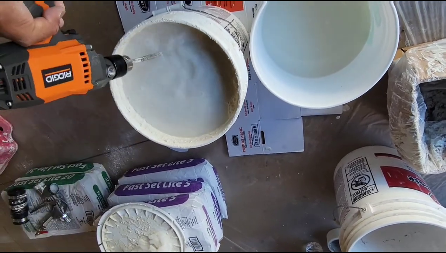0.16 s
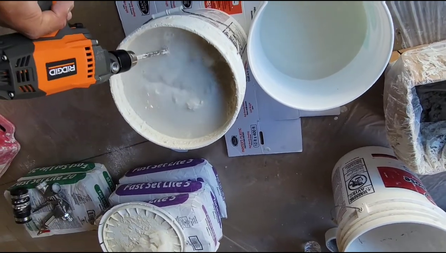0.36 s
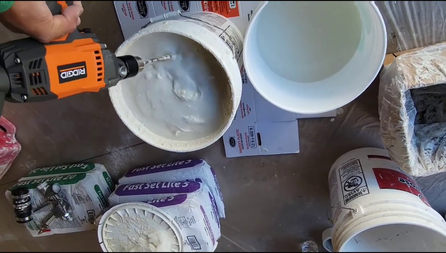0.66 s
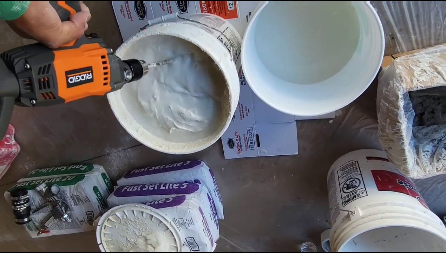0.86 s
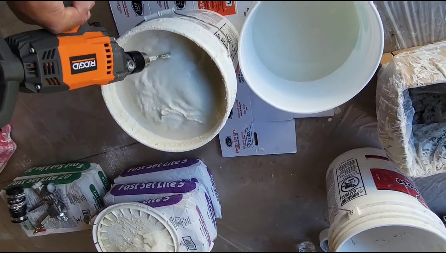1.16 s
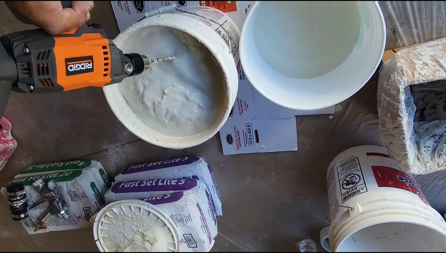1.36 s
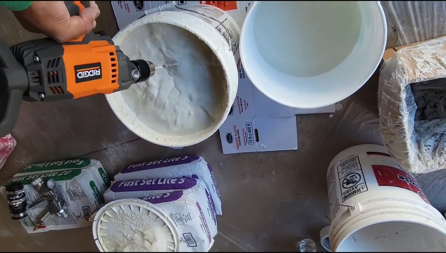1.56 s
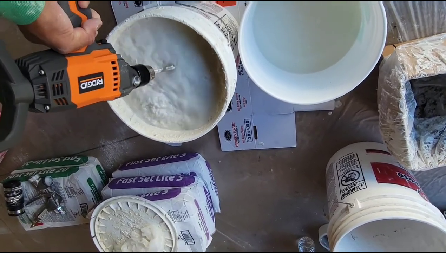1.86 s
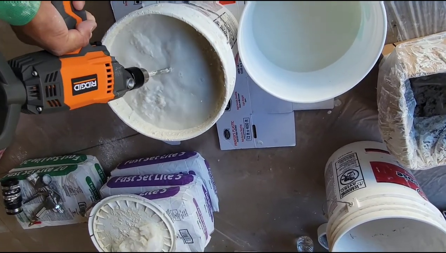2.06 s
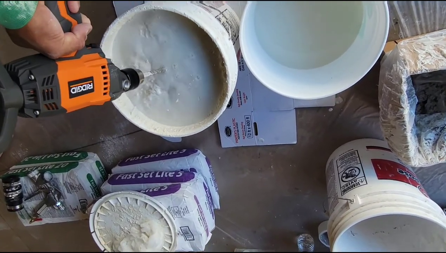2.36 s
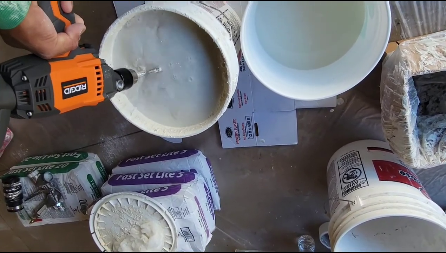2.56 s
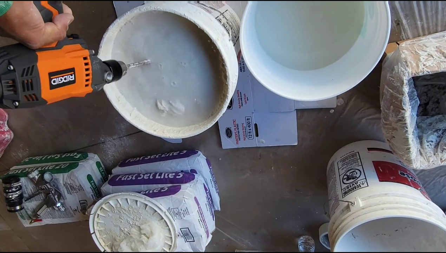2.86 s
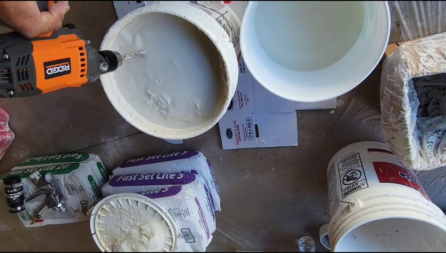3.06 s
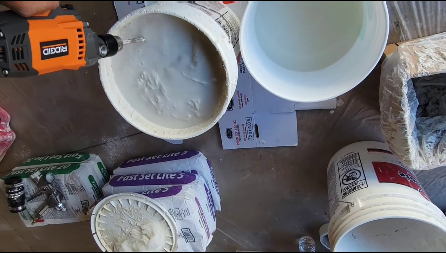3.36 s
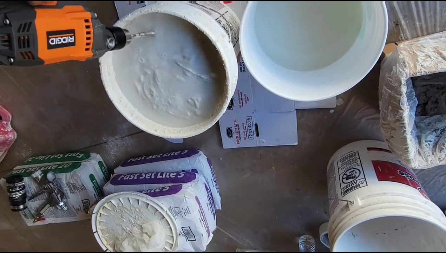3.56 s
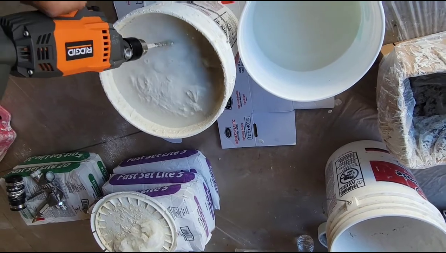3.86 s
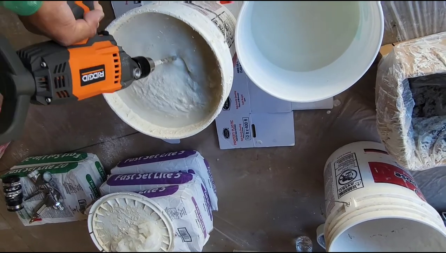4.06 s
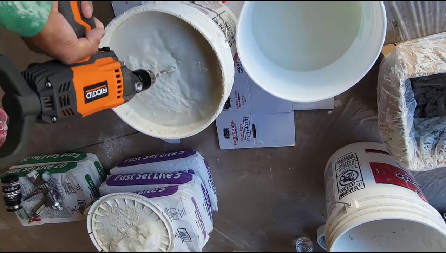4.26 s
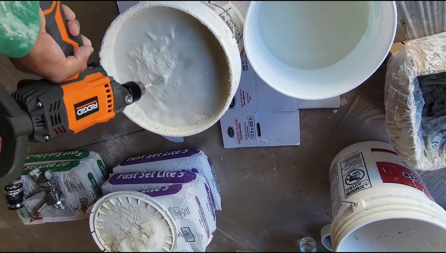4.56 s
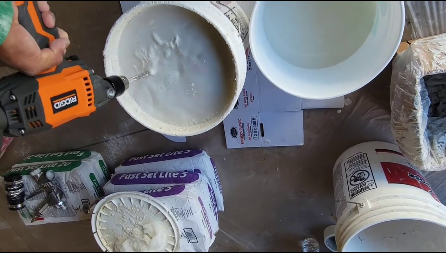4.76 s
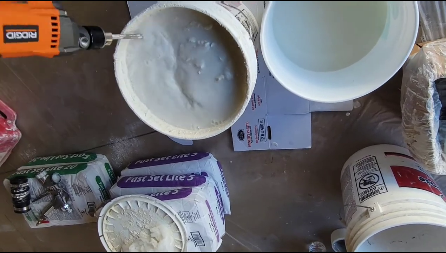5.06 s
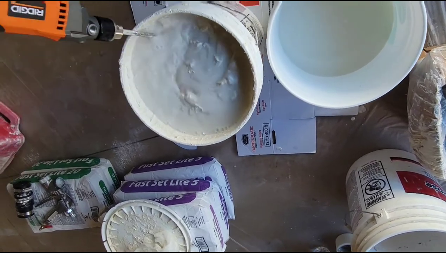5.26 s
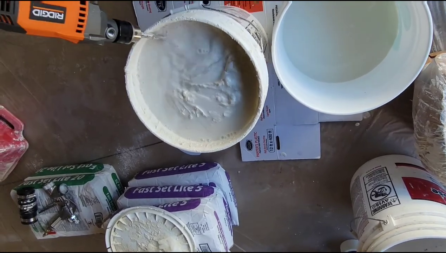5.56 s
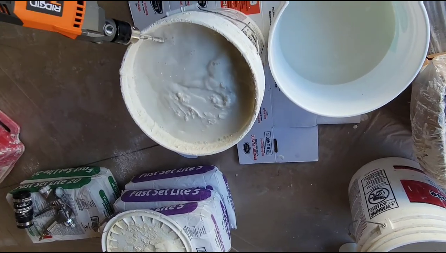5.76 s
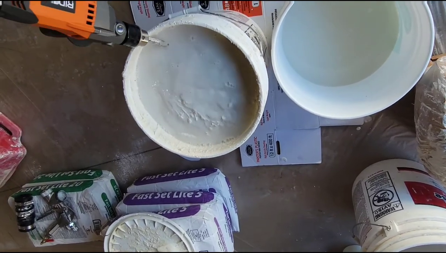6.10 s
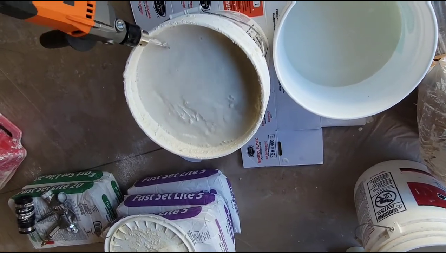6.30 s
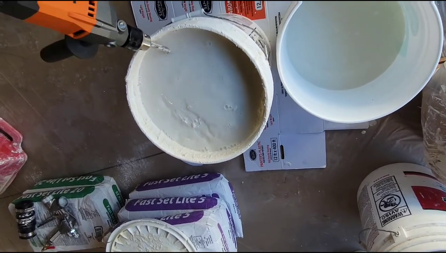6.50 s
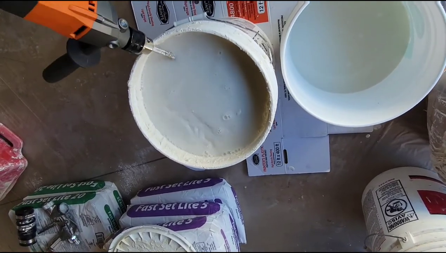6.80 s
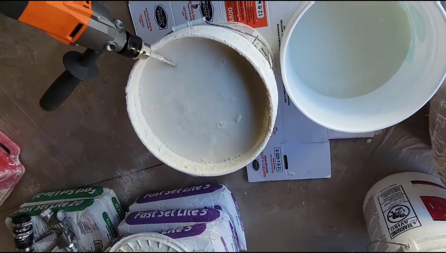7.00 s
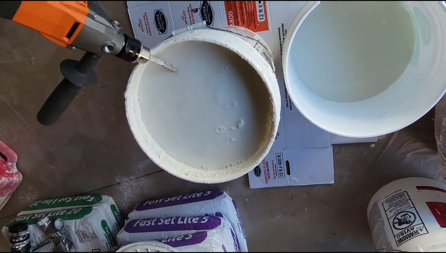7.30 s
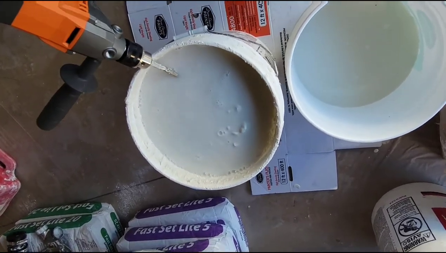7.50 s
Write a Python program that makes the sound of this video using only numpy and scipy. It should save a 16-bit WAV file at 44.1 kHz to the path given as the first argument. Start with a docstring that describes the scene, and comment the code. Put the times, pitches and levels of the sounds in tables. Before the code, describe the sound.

Close, loud drill motor with rushing fan air and raspy gears, wet paddle gulps early on, then a gliding wind-down to a scraping stop.

```python
"""Close by a plastic bucket, a phone's two microphone ports hear a corded mixing drill churn thick compound.
From the start its fan roars and whistles, brushes and gears rasp, the shaft hums and a far engine drones;
the paddle gulps, mostly in the first 1.3 s. At 5 s the drill is switched off and coasts to rest, its
falling tones swelling as they glide through the housing's resonances while the rasp goes on to the stop.
In the last moments, at 7.5 s, a soft rush sets in."""
import sys
import numpy as np
from scipy import signal
from scipy.fft import rfft, irfft
from scipy.io import wavfile

SR = 44100
rng = np.random.default_rng(int(sys.argv[2]) if len(sys.argv) > 2 else 0)


def persist_wave(psi):
    """Save psi, clipped to +-1, as 16-bit WAV."""
    counts = np.round(np.clip(psi, -1, 1) * 32767).astype(np.int16)
    wavfile.write(sys.argv[1], SR, np.atleast_2d(counts).T)


N = 336910
T = np.arange(N) / SR
FREQS = np.maximum(np.arange(N // 2 + 1) * SR / N, 1)
TOP_HZ = 15800  # the phone passes nothing above this
FULL_HZ = 378  # rotor turns per second at which the running levels are given


def undb(db):
    """Decibels to gain."""
    return 10 ** (np.asarray(db) / 20)


def unit(x):
    """Scale to rms 1, over both ports together."""
    return x / np.sqrt(np.mean(x ** 2))


def curve(rows):
    """Each column of a table, joined by straight lines in time."""
    time_s, *columns = np.transpose(rows)
    return np.array([np.interp(T, time_s, column) for column in columns])


def spectrum(rows, peaks=()):
    """Each column of a table over log frequency, plus bell-shaped resonances."""
    pitch_hz, *columns = np.transpose(rows)
    out = np.array([np.interp(np.log(FREQS), np.log(pitch_hz), column) for column in columns])
    for centre_hz, width_hz, *heights_db in peaks:
        out = out + np.outer(heights_db, np.exp(-((FREQS - centre_hz) / width_hz) ** 2))
    return out


def shape(x, gain):
    """Filter by a gain per frequency."""
    return irfft(rfft(x) * gain, N)


def band(low_hz, high_hz):
    """Gain of a band with soft edges."""
    return 1 / np.sqrt((1 + (low_hz / FREQS) ** 6) * (1 + (FREQS / high_hz) ** 6))


def ring(x, centre_hz, width_hz):
    """One resonance with steep skirts, at rms 1."""
    return unit(shape(x, 1 / (1 + 2j * (FREQS - centre_hz) / width_hz) ** 2))


def rise(hz, knee_hz, steepness):
    """Gain that grows as a power of speed or pitch, then levels off above the knee."""
    return (hz / (hz ** 4 + knee_hz ** 4) ** (1 / 4)) ** steepness


def walk(rate_hz):
    """Slow random wander with spread 1, smooth on the scale of the rate."""
    steps = np.arange(0, N, 64)
    hz = np.arange(len(steps) // 2 + 1) / T[-1]
    smoothing = np.exp(-np.minimum(hz / rate_hz, 20) ** 2)
    slow = irfft(rfft(rng.standard_normal(len(steps))) * smoothing, len(steps))
    return np.interp(T, steps / SR, unit(slow))


# direct sound reaching the two microphone ports: pitch_hz, left_lead_rad
PORT_LEAD = [(100, 0), (600, .3), (1000, 1.5), (1600, 2.2), (2500, 2.9), (3000, 5.3), (3500, 3.9),
             (5000, 3.8), (5900, 7.8), (7000, 11.8), (9600, 15.6), (11400, 18.3), (13500, 16.8),
             (15500, 18.6)]


def port_lead():
    """Phase of the direct sound at the left and right port, split evenly about their middle."""
    return np.exp(np.outer([.5j, -.5j], spectrum(PORT_LEAD)[0]))


# how alike the two microphone ports hear a noise: pitch_hz, likeness (0-1)
PORT_LIKENESS = [(100, 0.71), (300, 0.94), (560, 0.45), (750, 0.78), (1700, 0.96), (2300, 0.65),
                 (3200, 0.18), (3800, 0.35), (5100, 0.39), (6000, 0.17), (7300, 0.41), (9600, 0.33),
                 (12000, .18), (15000, 0.18)]


def port_noise():
    """Noise at both ports: a shared direct part and unrelated reflections."""
    alike = np.clip(spectrum(PORT_LIKENESS), 0, 1)
    direct = shape(rng.standard_normal(N), np.sqrt(alike) * port_lead())
    reflections = shape(rng.standard_normal((2, N)), np.sqrt(1 - alike))
    return direct + reflections


# engine far off: pitch_hz, level_db
FAR_ENGINE = [(54, -65.5), (70.8, -52.5), (88, -52), (120, -63.5)]
# dull air round the place: pitch_hz, relative level_db
AMBIENT_COLOUR = [(20, -34.5), (38, -19), (52, -3), (80, -3.5), (150, -9), (300, -16.5), (380, -11),
                  (520, -16), (720, -17.5), (1500, -21.5), (4000, -29), (8000, -45), (15000, -42)]
# soft rush at the end: pitch_hz, relative left_db, relative right_db
RUSH_COLOUR = [(100, -12, -7), (250, -6, -13), (380, 9, -3), (550, -3, -9), (800, 7, 3), (1090, -6, -6),
               (1700, 3, 5), (2500, -1, 2), (3400, -8, -14), (4940, -5, -15), (6300, -26, -20),
               (8500, -33, -30), (12500, -31, -35), (15400, -38, -46)]
RUSH_START_S = 7.497


def surroundings(ambient_db=-53.5, rush_db=-40.5, rush_rise_s=0.021, waver_rad=0.99, pan_db=0.9):
    """Far off, engine tones waver in level and phase over dull air; late, a soft rush of noise jumps in."""
    drone = 0
    for pitch_hz, level_db in FAR_ENGINE:
        level = undb(level_db + 2.1 * walk(4)) * np.sqrt(2)
        drone = drone + level * np.sin(2 * np.pi * pitch_hz * T + waver_rad * walk(3))
    ambient = undb(ambient_db) * unit(shape(port_noise(), undb(spectrum(AMBIENT_COLOUR))))
    onset = np.interp(T - RUSH_START_S, [0, .003, rush_rise_s], [0, .6, 1])
    rush = undb(rush_db) * onset * unit(shape(port_noise(), undb(spectrum(RUSH_COLOUR))))
    return (drone + ambient) * undb([[pan_db], [-pan_db]]) + rush


# rotor under power, creeping up as the compound thins: time_s, speed_hz (turns per second)
POWERED_SPEED = [(0, 366.5), (.4, 372.7), (.9, 374.5), (1.12, 373.5), (1.42, 376.5), (1.75, 375.5),
                 (2.4, 378.3), (2.9, 377.8), (4.6, 382.7), (5.0, 381)]
SWITCH_OFF_S = 5.0243
# braking at full speed, and the power of speed that each brake follows
FRICTION_HZ_PER_S, FRICTION_STEEPNESS = 177.2, .274
DRAG_HZ_PER_S, DRAG_STEEPNESS = 257.9, 2.924


def rotor_speed():
    """Turns per second: nearly steady under power, then braked by friction and the drag of fan and compound."""
    powered = curve(POWERED_SPEED)[0]
    falling = np.linspace(powered[-1], 1, 2000)
    share = falling / FULL_HZ
    friction = FRICTION_HZ_PER_S * share ** FRICTION_STEEPNESS
    drag = DRAG_HZ_PER_S * share ** DRAG_STEEPNESS
    # time at which the rotor has fallen to each speed
    reached_s = SWITCH_OFF_S + np.cumsum((falling[0] - falling[1]) / (friction + drag))
    return np.where(T < SWITCH_OFF_S, powered, np.interp(T, reached_s, falling, right=0))


# paddle folding air into the compound: start_s, relative level_db
GULP_TIMES = [(0.533, -29), (0.652, -26.5), (0.772, -32), (0.89, -36), (1.006, -28.5), (1.109, -30),
              (1.139, -32), (1.254, -27), (5.039, -34), (5.099, -35), (5.899, -36)]


def paddle(hz, gulp_db=-1.5, decay_s=0.021, rise_s=0.0076, churn_db=-54.0, gear_ratio=37.0):
    """In the bucket: dull noise gulps in the compound, over a churning that swells once per paddle turn."""
    gulps = np.zeros(N)
    for start_s, level_db in GULP_TIMES:
        age_s = np.maximum(T - start_s, 0)
        gulps += undb(level_db + gulp_db) * (1 - np.exp(-age_s / rise_s)) * np.exp(-age_s / decay_s)
    stroke = 1 + 0.53 * np.cos(2 * np.pi * np.cumsum(hz) / SR / gear_ratio)
    churn = undb(churn_db + 2 * walk(3)) * stroke * hz / FULL_HZ
    compound = unit(shape(rng.standard_normal(N), band(85, 320)))
    return (gulps + churn) * compound


# hard surfaces round the bucket that echo the drill: delay_s, each varied by up to 15 %
BUCKET_ECHOES = [.0071, .0113, .0167, .0239, .031, .043]
# hands and bucket rim close to the vents: delay_s
RIM_ECHOES = [0.000296, 0.00076, 0.0016]


def reflect(x, echo_db=-17.0, sway_s=0.000204, near_db=-18.0):
    """Short echoes comb the noise; the colour drifts as the drill is moved."""
    out = x.copy()
    for port in range(2):
        for delay_s in BUCKET_ECHOES:
            path_s = delay_s * rng.uniform(.85, 1.15) + sway_s * walk(0.415)
            out[port] += undb(echo_db) * np.interp(T - path_s, T, x[port], left=0)
        for delay_s in RIM_ECHOES:
            out[port] += undb(near_db) * walk(1) * np.interp(T - delay_s, T, x[port], left=0)
    return unit(out)


def shaft_line(hz, angle, multiple, scatter, flutter_hz):
    """One order of the shaft; reflections make it flutter differently at each port."""
    lead = np.interp(multiple * hz, *np.transpose(PORT_LEAD))
    direct = np.exp(np.outer([.5j, -.5j], lead))
    knots_s = np.arange(0, T[-1] + 1, 1 / flutter_hz)
    random = rng.standard_normal((2, len(knots_s))) + 1j * rng.standard_normal((2, len(knots_s)))
    echoes = np.array([np.interp(T, knots_s, port) for port in random])
    tone = (direct + scatter * echoes) * np.exp(1j * multiple * angle)
    return unit(tone.real) * (multiple * hz < TOP_HZ)


# gear teeth that excite the gear case: multiple of shaft speed
TEETH = [8, 12, 18, 24, 36]


def gear_case(rub, hz, angle, teeth_db=-17.5, low_db=-55., high_db=-28.5, flutter_db=3.0, pan_db=1.5):
    """Rubbing excites a wide high ring; with passing teeth it keeps a narrow low one going almost to the stop."""
    teeth = undb(teeth_db) * sum(np.cos(multiple * angle) for multiple in TEETH)
    low = undb(low_db + flutter_db * walk(9)) * ring(rub + teeth, centre_hz=719.0, width_hz=72.)
    low = low * rise(hz, knee_hz=24., steepness=1.4)
    high = undb(high_db) * ring(rub, centre_hz=1067.0, width_hz=390.0)
    high = high * rise(hz, knee_hz=137.6, steepness=2.08)
    return (low + high) * undb([[pan_db], [-pan_db]])


# brushes and gears heard through the body: pitch_hz, relative left_db, relative right_db
BODY_COLOUR = [(130, -20, -22), (398, -8.5, -12), (660, -9, -13.5), (1100, -9, -6), (1760, -2, -4),
               (2500, -6.5, -3), (5350, -6.5, -20.5), (8450, -34.5, -28.5), (13000, -26.5, -36),
               (15500, -40, -58)]
# resonances of the body: pitch_hz, width_hz, left_db, right_db
BODY_RESONANCES = [(2298, 183, 1.5, 7.1), (4080, 200, 2, 1), (4940, 240, 3.5, 2), (6200, 600, -10.5, 4.3),
                   (14700, 700, 1, 5)]
# bars and teeth that ring the body: multiple of shaft speed
BODY_ORDERS = [12, 36, 39, 48, 72, 96, 120, 144]
# one for each of those orders: relative level_db
BODY_ORDER_LEVELS = [-20, -30, -21, -18.5, -13, -13.5, -19, -21.5]
# bands in which those lines swell or fade: pitch_hz, level_db
BODY_ORDER_COLOUR = [(1000, -16), (2000, 1), (2400, -4.5), (3000, -17), (3400, 1.5), (4200, 1), (4800, -9),
                     (5300, 3), (5700, 6), (6600, -2), (8500, 2.5), (14000, 3)]
# dry sliding at a crawl, thinner and brighter than the rasp at speed: pitch_hz, relative level_db
CRAWL_COLOUR = [(300, 2.5), (1500, -8), (2350, -0.5), (3100, -0.5), (4000, 6), (5100, -0.5), (6500, 5),
                (10000, 11.5), (13000, 6.5), (15500, 0)]
STALL_HZ = 18  # dry sliding dies away below this speed


def brushes_and_gears(hz, angle, rasp_db=-23., knee_hz=210.5, steepness=1.9, creep_db=-49.5, chatter=0.2,
                      uneven_db=1.):
    """Sliding contact rasps, once a turn when slow; bars and teeth add lines that fall with speed; all ring the body."""
    slow = np.clip(1 - hz / FULL_HZ, 0, 1)
    rub = reflect(port_noise()) * (1 + chatter * slow * np.cos(angle)) * undb(uneven_db * walk(60))
    lines = 0
    for multiple, level_db in zip(BODY_ORDERS, BODY_ORDER_LEVELS):
        lines = lines + undb(level_db) * shaft_line(hz, angle, multiple, scatter=1.0, flutter_hz=68.8)
    # the lines fade out between 50 and 25 turns per second
    lines = shape(lines, undb(spectrum(BODY_ORDER_COLOUR))) * np.clip(hz / 25 - 1, 0, 1)
    body = unit(shape(rub + lines, undb(spectrum(BODY_COLOUR, BODY_RESONANCES))))
    rasp = body * undb(rasp_db) * rise(hz, knee_hz, steepness)
    creep = shape(body, undb(spectrum(CRAWL_COLOUR) + creep_db)) * rise(hz, STALL_HZ, steepness=1.3)
    return rasp + creep + gear_case(rub, hz, angle)


# housing resonances that lift a tone gliding through: pitch_hz, width_hz, left_db, right_db
HOUSING_RESONANCES = [(473, 40, 6, 5), (698.3, 49.3, 13.5, 15), (760.4, 12, 5.5, 3), (1047, 120, 17.5, 6),
                      (1840, 186, 10, 11), (2320, 200, 4, 22), (2740, 220, 12, 4), (3590, 780, 17.5, 2),
                      (4100, 310, 6.5, 6), (6940, 450, 7, 6), (9130, 850, 2, 18.5), (11000, 1100, 5.5, 6)]
RADIATES_HZ = 460  # the small housing gives off little sound below this pitch


def housing_db(tone_hz):
    """Radiation of a tone to each port: housing resonances lift it, the small size cuts the bass."""
    lift = 0
    for centre_hz, width_hz, *heights_db in HOUSING_RESONANCES:
        distance = np.minimum(((tone_hz - centre_hz) / width_hz) ** 2, 20)
        lift = lift + np.outer(heights_db, np.exp(-distance))
    return lift + 20 * np.log10(rise(tone_hz + 1, RADIATES_HZ, steepness=4.0))


# rotor unbalance, magnetic pull, commutator bars: multiple of shaft speed
MAIN_ORDERS = [2, 4, 24]
# one row for each, before the housing: left_db, right_db (coasting at full speed), change under power_db,
# power of speed, scatter (0-1), flutter_hz
MAIN_ORDER_SETTINGS = [(-42.5, -49.5, 7.5, 2, 0.26, 10), (-34, -35, 3.5, 1.24, 0.4, 26),
                       (-43.5, -48.5, -8.5, .45, 0.64, 24)]
# faint shaft orders: multiple of shaft speed, level_db at full speed
FAINT_ORDERS = [(6, -41.5), (8, -35.5), (19, -38.5), (20, -39), (33, -47.5), (36, -43), (37, -48)]
POWER_FADE_S = 0.037  # the change under power goes this fast once the current is cut
CRAWL_HZ = 66.  # the rotor's tones sink into the rasp below this speed


def whine(hz, angle):
    """Rotor and commutator tones: they weaken as the shaft slows and swell where they cross a resonance."""
    speed = hz / FULL_HZ
    powered = np.clip(1 - (T - SWITCH_OFF_S) / POWER_FADE_S, 0, 1)
    out = 0
    for multiple, settings in zip(MAIN_ORDERS, MAIN_ORDER_SETTINGS):
        left_db, right_db, power_db, steepness, scatter, flutter_hz = settings
        level_db = np.array([[left_db], [right_db]]) + power_db * powered + housing_db(multiple * hz)
        line = shaft_line(hz, angle, multiple, scatter, flutter_hz)
        out = out + undb(level_db) * speed ** steepness * line
    for multiple, level_db in FAINT_ORDERS:
        line = shaft_line(hz, angle, multiple, scatter=1.0, flutter_hz=29.4)
        out += undb(level_db) * speed ** 2 * line
    return out * rise(hz, CRAWL_HZ, steepness=3.)


# the fan's whistle as the drill is moved about: time_s, relative level_db
WHISTLE_LEVEL = [(0.05, -33), (0.14, -31), (0.49, -36), (1.33, -28), (1.4, -38.5), (1.85, -29), (1.93, -41),
                 (2.39, -31), (2.55, -37), (2.79, -30), (3.25, -35), (3.82, -28), (3.99, -39), (4.9, -36)]
WHISTLE_ORDER = 39  # multiple of shaft speed


def whistle(hz, angle, left_db=7.5, right_db=-2.5, steepness=3.4):
    """The fan's thin whistle glides down with the rotor and fades quickly."""
    level_db = curve(WHISTLE_LEVEL) + np.array([[left_db], [right_db]]) + housing_db(WHISTLE_ORDER * hz)
    line = shaft_line(hz, angle, WHISTLE_ORDER, scatter=0.35, flutter_hz=44.3)
    return undb(level_db) * (hz / FULL_HZ) ** steepness * line


# fan air leaving the vents: pitch_hz, relative left_db, relative right_db
VENT_AIR = [(130, -26.5, -34), (298, -25, -28.5), (544, -14, -29.5), (698, -4.5, -5.5), (1023, -7.5, -10.5),
            (1780, 2, 2), (2220, -11, -7.5), (5430, -4, -13), (8530, -23, -10), (13330, -14.5, -25.5),
            (15500, -27, -27)]
# the housing's resonances in that air: pitch_hz, width_hz, left_db, right_db
VENT_RESONANCES = [(612, 31, -4.5, 0), (1149, 19, 7, 7.5), (1254, 52, -2, 4.2), (1563, 39, -2.5, 2),
                   (2015, 30, -6, 6), (2000, 72, -4, -4.5), (2340, 110, -3.5, -3.5), (3010, 260, 6.5, 4.5),
                   (3424, 300, -5, -8.5), (3750, 106, 5.5, 2.5), (4160, 190, -1.7, -4),
                   (6530, 1050, -6, 0.3), (7000, 270, 2, 3), (8380, 930, -2, -8.5)]
# fan roar as the drill is moved about: time_s, relative level_db, middle band against that level_db
ROAR_LEVEL = [(0, -20, 1.5), (1.2, -19.5, 1.5), (3.1, -20.5, 3), (3.7, -20.5, 3), (4, -20.5, 2),
              (4.5, -20, 2), (5, -21, 3)]


def fan(hz, air_db=5., low_steepness=1.74, steepness=2.47, top_db=-8.5, top_steepness=2.4, gust_db=0.58):
    """Close at the vents, turbulent air roars; it dies steeply with speed, the lows more slowly."""
    speed = hz / FULL_HZ
    level_db, bright_db = curve(ROAR_LEVEL)
    air = reflect(shape(port_noise(), undb(spectrum(VENT_AIR, VENT_RESONANCES))))
    low = shape(air, band(0.89, 2750) ** 2)
    top = shape(air, band(7300, SR) ** 2)
    middle = (air - low - top) * undb(bright_db)
    roar = low * speed ** low_steepness + middle * speed ** steepness
    roar = roar + unit(top) * undb(top_db) * speed ** top_steepness
    return roar * undb(level_db + air_db + gust_db * walk(35))


def scene():
    """One slightly unsteady rotor speed drives every part of the drill, over the surroundings."""
    hz = rotor_speed() * (1 + 0.00023 * walk(13.4))
    angle = 2 * np.pi * np.cumsum(hz) / SR
    drill = brushes_and_gears(hz, angle) + whine(hz, angle) + whistle(hz, angle) + fan(hz)
    return surroundings() + paddle(hz) + drill


def record(dry):
    """The phone cuts the top with a steep low-pass."""
    return signal.sosfilt(signal.ellip(10, .2, 80, TOP_HZ, fs=SR, output="sos"), dry)


dry = scene()
out = record(dry)
persist_wave(out)
```